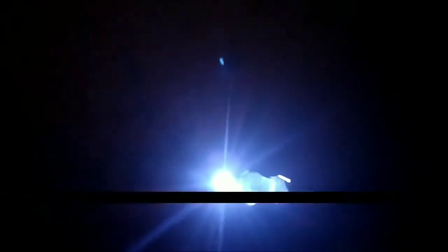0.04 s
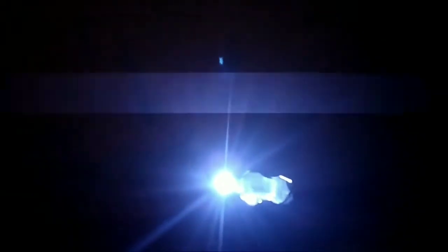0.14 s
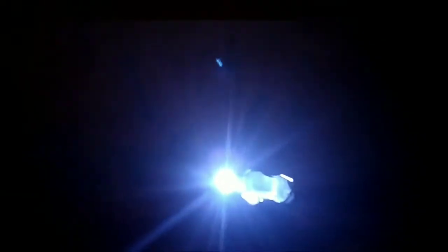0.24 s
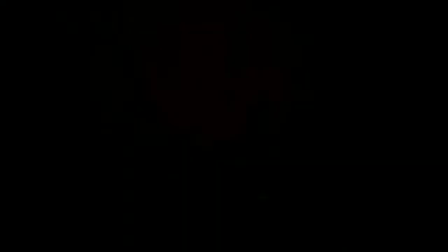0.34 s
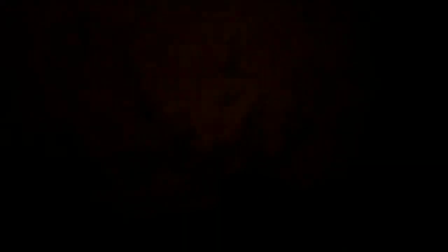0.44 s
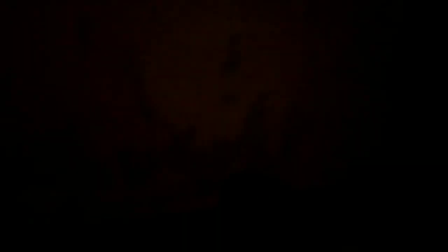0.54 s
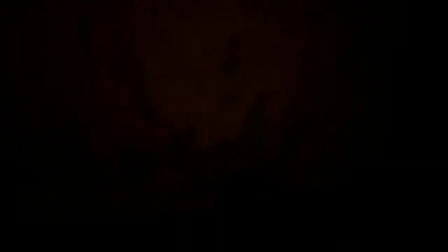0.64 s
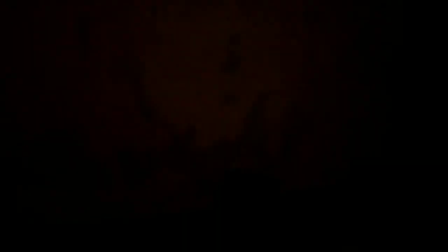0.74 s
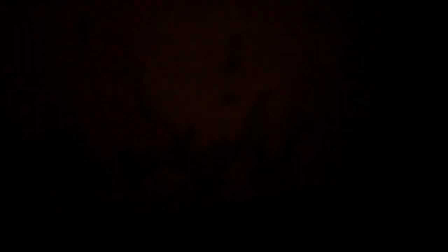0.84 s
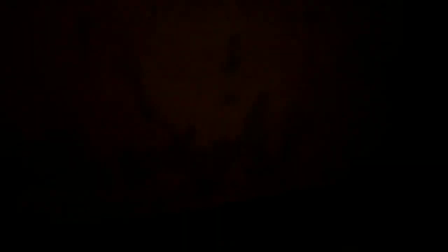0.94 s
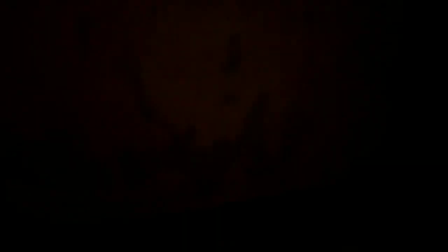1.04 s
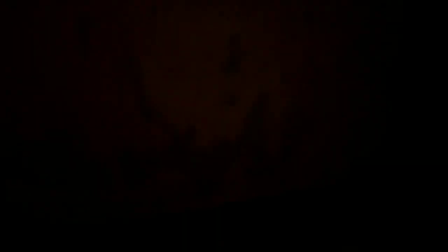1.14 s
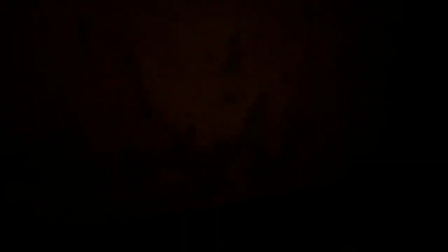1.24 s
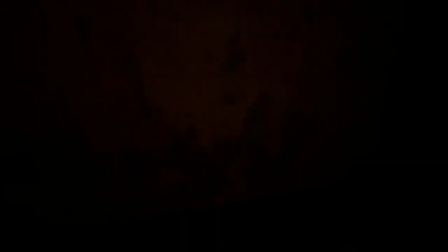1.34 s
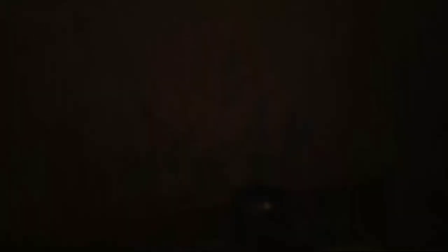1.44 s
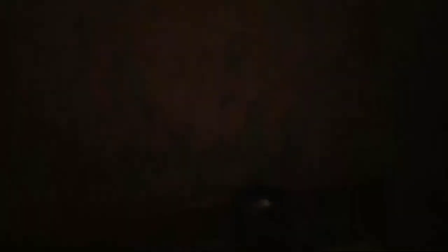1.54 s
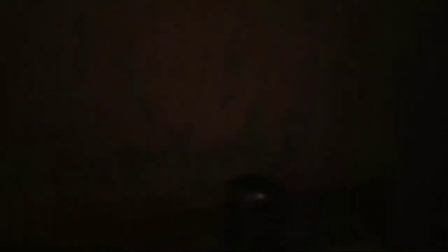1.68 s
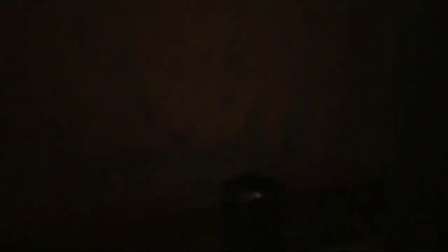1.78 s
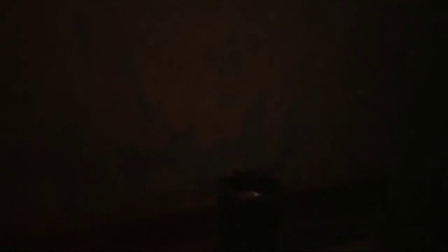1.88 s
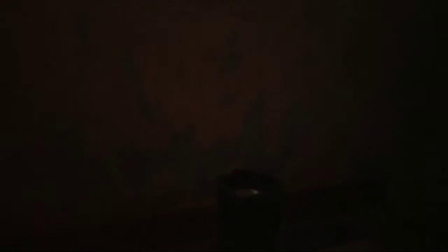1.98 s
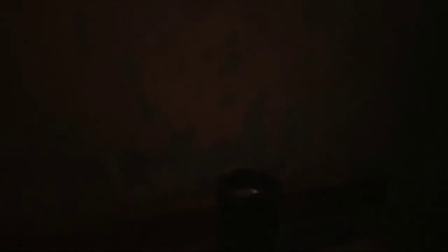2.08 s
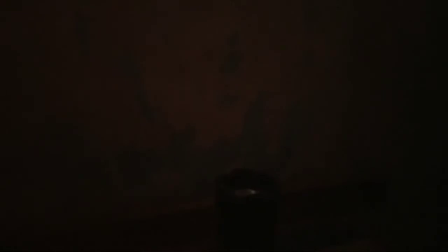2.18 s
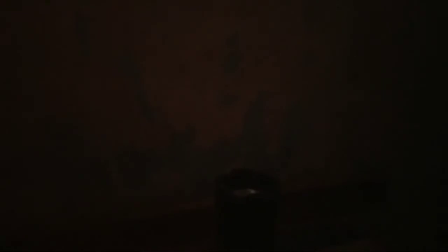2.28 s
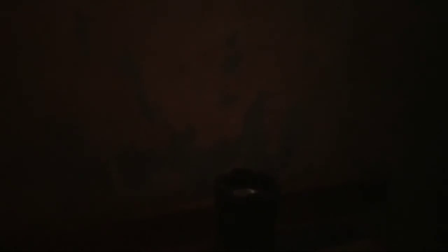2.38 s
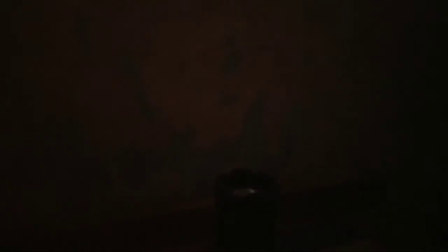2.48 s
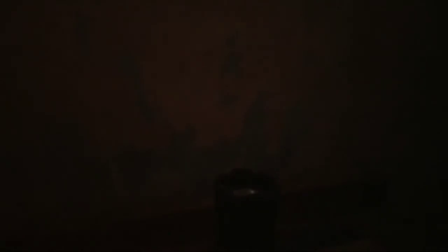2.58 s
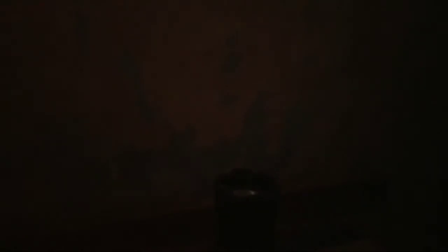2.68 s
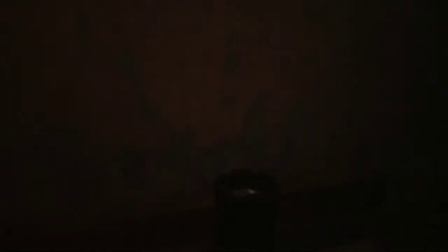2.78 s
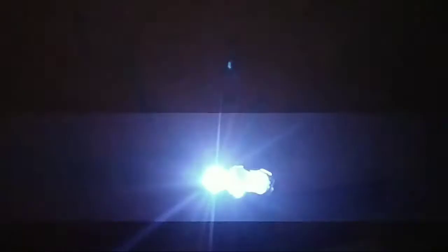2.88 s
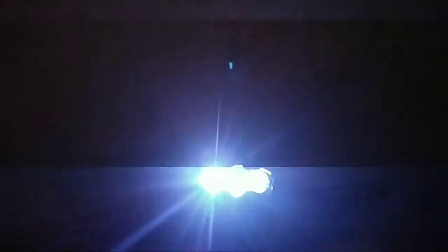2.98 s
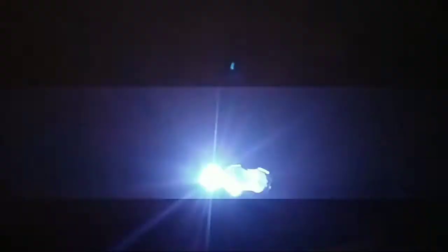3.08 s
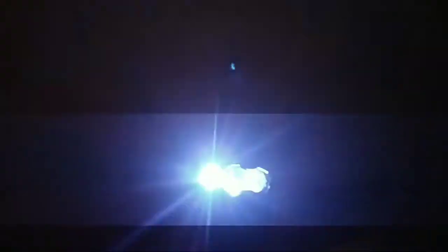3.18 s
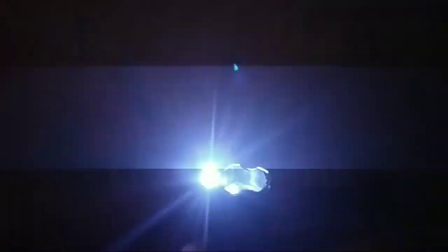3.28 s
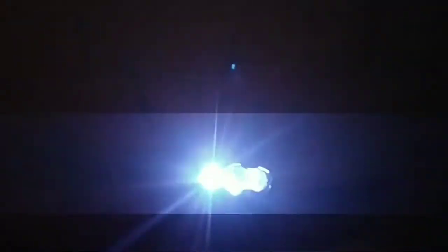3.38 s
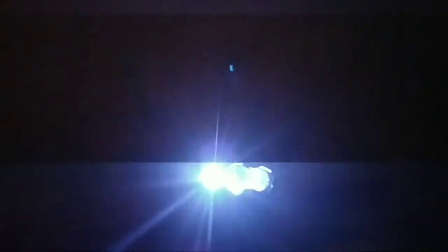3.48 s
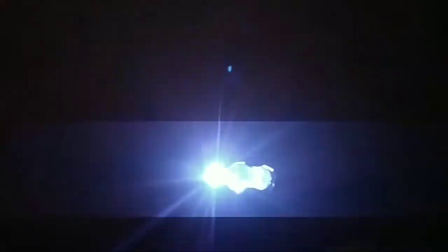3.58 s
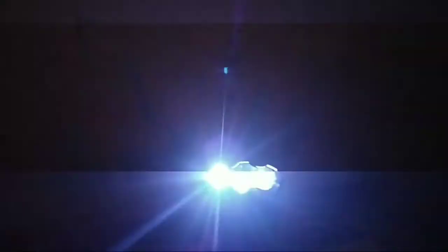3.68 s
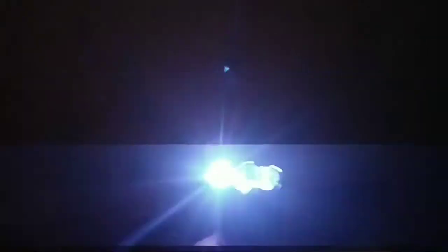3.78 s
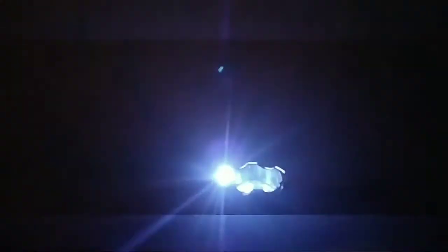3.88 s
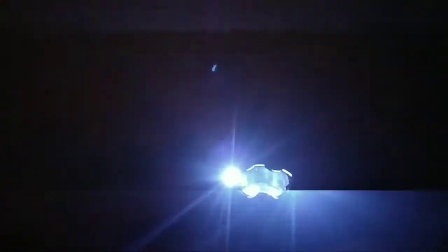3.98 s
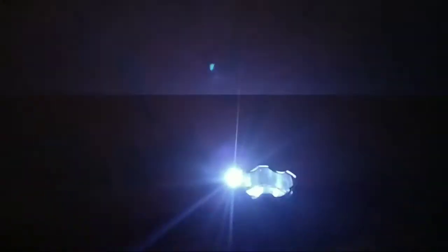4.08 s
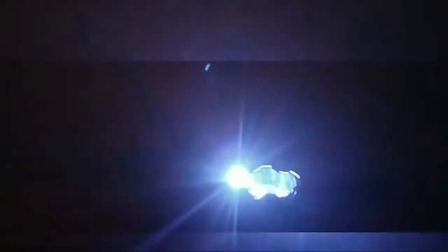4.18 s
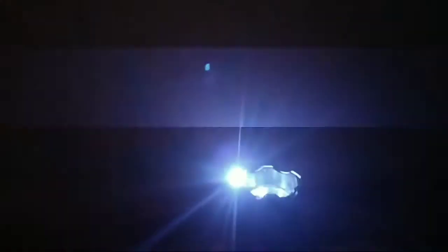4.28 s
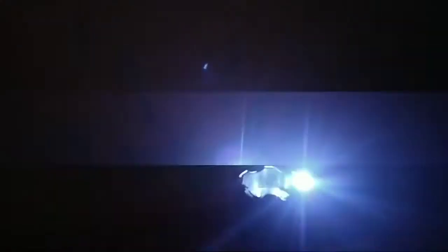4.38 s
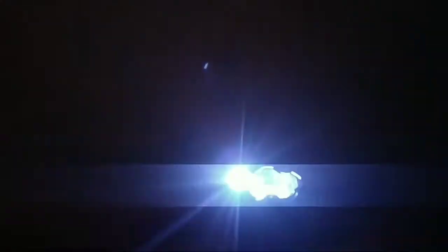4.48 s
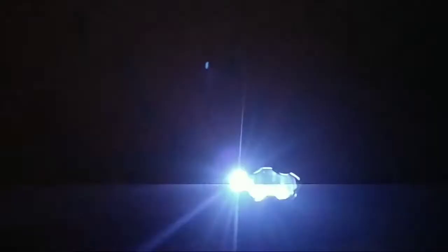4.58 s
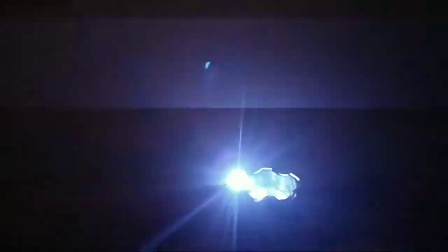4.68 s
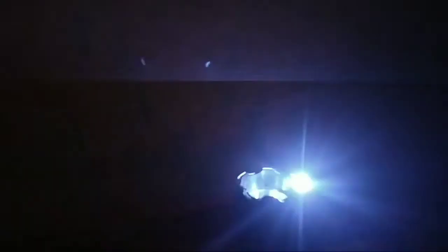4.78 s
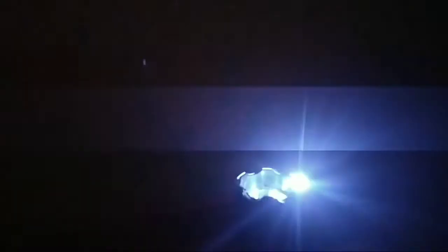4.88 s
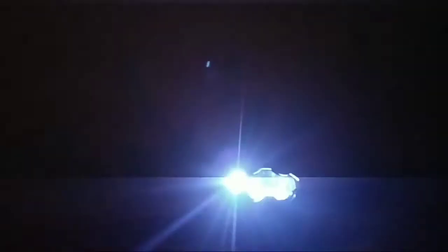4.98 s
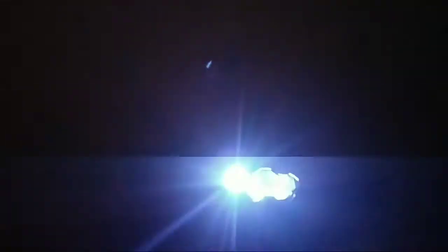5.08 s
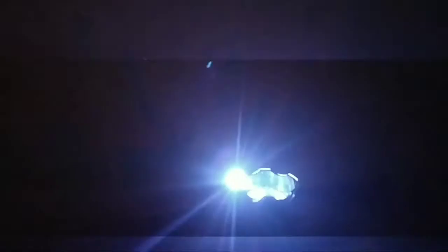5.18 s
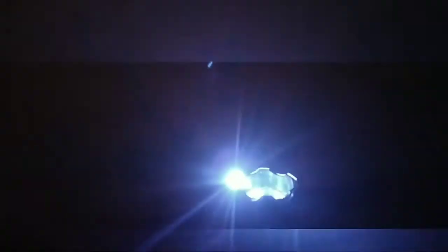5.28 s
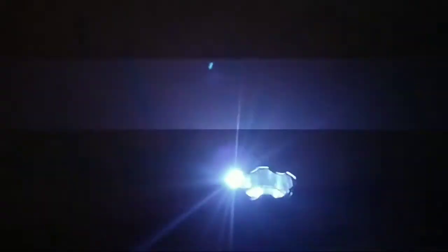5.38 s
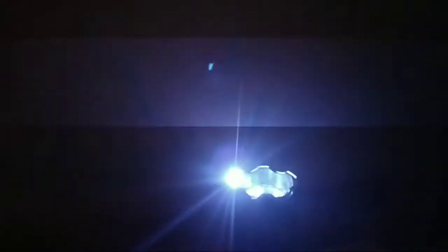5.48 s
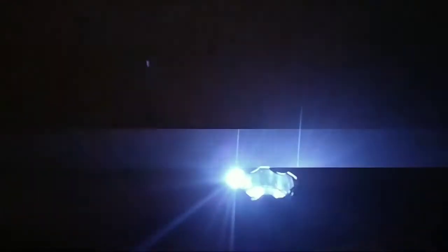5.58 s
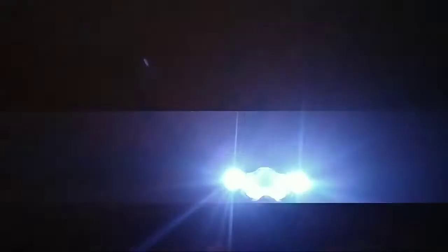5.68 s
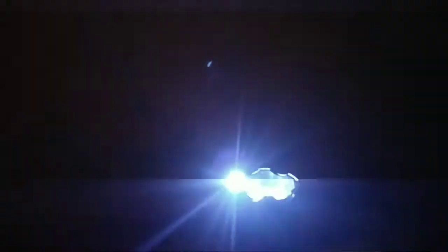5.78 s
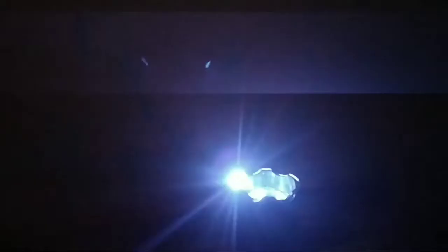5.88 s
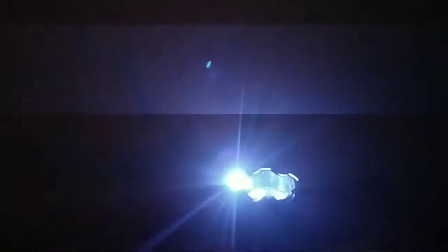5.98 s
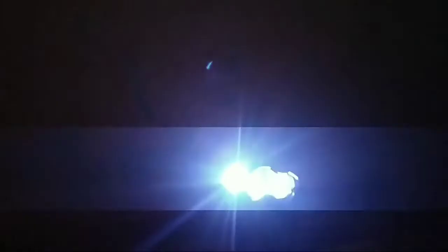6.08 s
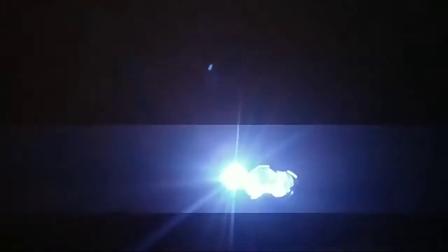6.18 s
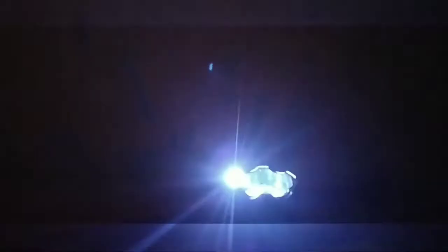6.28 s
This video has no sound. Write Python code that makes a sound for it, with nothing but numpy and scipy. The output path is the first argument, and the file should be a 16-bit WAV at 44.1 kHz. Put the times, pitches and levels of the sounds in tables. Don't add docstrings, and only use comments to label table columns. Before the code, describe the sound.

A handheld stun gun crackles very close to an overloaded stereo microphone in a small hard-walled room. A short burst of bright, rapid sparks is already under way, stops and rings away, leaving low rumble and hum. A small switch click and grip knock follow, then a much longer, harsher burst continues to the end.

```python
import sys
import numpy as np
from scipy import signal
from scipy.fft import rfft, irfft, next_fast_len
from scipy.io import wavfile
from scipy.ndimage import uniform_filter1d

SR = 44100
rng = np.random.default_rng(int(sys.argv[2]) if len(sys.argv) > 2 else 0)


def amp(db):
    return 10 ** (np.asarray(db, float) / 20)


def write(x):
    x = np.atleast_2d(x).T
    wavfile.write(sys.argv[1], SR, np.round(np.clip(x, -1, 1) * 32767).astype(np.int16))


N = 279593
RUN_IN = 13230
SIZE = next_fast_len(N + 2 * RUN_IN)
PAUSE = 2 * SR


def fill(hard):
    # start_s, crack_db, throw_left_percent, throw_right_percent
    hand_aim = [(0, -27, 0.55, -1), (.45, -24, .4, -1.5), (2.96, -25.5, 0.74, -5.5), (3.3, -27, 2.5, -3.5),
                (3.68, -28, 3.5, -3), (3.95, -25.5, 6.1, -6), (4.0, -27, 5.6, 1.5), (4.65, -26.5, 2.7, 5),
                (5.2, -27, 3.7, 3), (6.0, -25.5, 1.7, 3), (6.3, -26.5, 3, 4.5)]
    charge_s, jitter_s = .0303, .0006
    crack_spread_db, throw_spread_percent = 1.57, 2.83
    rebound = 0.84
    aim_s, *aim = np.transpose(hand_aim)
    rows = [hard[0]]
    for (start_s, _, throw_left, _), following in zip(hard, hard[1:]):
        gap_s = following[0] - start_s
        steps = round(gap_s / charge_s)
        at = start_s + gap_s * np.arange(1, steps) / steps
        spreads = [jitter_s, crack_spread_db, throw_spread_percent, throw_spread_percent]
        luck = rng.standard_normal((len(at), 4)) * spreads
        luck[:1, 2] -= rebound * min(throw_left, 0)
        usual = np.transpose([at, *(np.interp(at, aim_s, column) for column in aim)])
        rows += [*(usual + luck), following]
    return np.array(rows)


def fire():
    # start_s, crack_db, throw_left_percent, throw_right_percent
    first_burst = [(.0001, -28.5, 0, 3), (.0952, -26.5, -2, -1.5), (.1584, -23, -4.5, -3),
                   (.189, -25, 0, -3), (.2842, -19.5, -3, 3), (.3172, -24, 0, -7), (.3492, -24, -3.5, -1),
                   (.3817, -23, -2, -2), (.4133, -25.5, 3.5, -4), (.4455, -25.5, -2, -3)]
    second_burst = [(2.9637, -21, 1, 22), (3.0215, -23.5, -3.5, -6), (3.0786, -25, 15, 2.5),
                    (3.1378, -20.5, -7, -2), (3.1939, -24.5, -7.5, -2.5), (3.3664, -23, 15, 1),
                    (3.3947, -23, -11, -3.5), (3.454, -23.5, -7, -1), (3.541, -23.5, -4, -6),
                    (3.8643, -20.5, -14, 4), (4.0128, -24, 9, 6.5), (4.0432, -25, -5.5, 2),
                    (4.0728, -24.5, 4, 11.5), (4.161, -22.5, -5, -6), (4.3701, -23.5, -4.5, -8.5),
                    (4.5533, -20, -9, -11), (4.7033, -22.5, -0.5, -7), (4.823, -22.5, 7, 9.5),
                    (4.8836, -22, -7.5, -8.5), (4.943, -21, -6.5, -8.5), (5.0055, -24, -6.5, -5.5),
                    (5.2795, -23, -5, -6), (5.4629, -23.5, -10, -6.5), (5.5837, -24, 3, 7.5),
                    (5.7038, -22, -9.5, -3.5), (5.8272, -21, -11, -8), (5.9786, -22, -4.5, -9),
                    (6.041, -25, -5.5, -4), (6.135, -24.5, 8, 6.5), (6.32, -26, -6.5, -2.8)]
    return np.r_[fill(first_burst), fill(second_burst)]


FIRED = fire()


def train(levels):
    clicks = np.full((2, N + RUN_IN), 1e-18)
    clicks[:, RUN_IN + np.round(FIRED[:, 0] * SR).astype(int)] = levels
    clicks[:, RUN_IN % 1400:RUN_IN - 700:1400] = np.mean(levels)
    return clicks


def spread(clicks, shape):
    return signal.oaconvolve(clicks, shape, axes=1)[:, :clicks.shape[1]]


def bursts(decay_ms, steep):
    # delay_ms, left_db, right_db
    arrivals = [(0, -5, -4.5), (3.41, -7, -3), (5.75, -1, -2.5), (7.65, -7, -5.5), (12.46, -7, -11.5),
                (16.24, -2, -12), (18.42, -5.5, -13.5), (22.68, -12, -14.5)]
    ms = np.arange(1500) * 1000 / SR
    envelope = 0
    for delay_ms, left_db, right_db in arrivals:
        height = amp(steep * np.array([[left_db], [right_db]]))
        dying = np.exp(-np.maximum(ms - delay_ms, 0) / decay_ms)
        envelope = envelope + height * (ms >= delay_ms) * dying
    return envelope


def at_hz(points, hz):
    point_hz, value = np.transpose(points)
    return np.interp(np.log(hz), np.log(point_hz), value)


def coloured(x, spectrum, tilt):
    hz = np.arange(SIZE // 2 + 1) * SR / SIZE + 1
    gain = amp(at_hz(spectrum, hz) + np.outer([.5, -.5], at_hz(tilt, hz)))
    return irfft(rfft(x, SIZE) * gain, SIZE)[:, :x.shape[1]]


def band(x, low_hz, high_hz):
    sos = signal.butter(2, [low_hz, min(high_hz, .45 * SR)], "band", fs=SR, output="sos")
    return signal.sosfilt(sos, x)


def arc():
    # pitch_hz, level_db (per Hz)
    arc_colour = [(500, -35.5), (1000, -25), (1800, -14), (3000, -9.5), (4100, -12.5), (4700, -18.5),
                  (5600, -20), (6800, -17), (7600, -10), (8500, 0.5), (9800, -4.5), (14300, -4),
                  (14700, -28.5), (15200, -48)]
    # pitch_hz, difference_db
    arc_tilt = [(2000, 0), (6000, 0), (8300, -7.5), (9800, -2.5), (11500, 3.5), (14500, 3.5)]
    # pitch_hz, t60_s
    room_t60 = [(1200, .5), (2400, 0.46), (4500, 0.45), (7000, 0.44), (9000, 0.37), (12500, 0.38)]
    # pitch_hz, change_db
    first_tint = [(900, 0), (1200, -1.5), (2500, -1.5), (5000, 1.5), (8300, -1), (9300, 0.5), (10800, -1)]
    echo_lift_db, repeat_share = 6.5, .4
    shocks = train(amp(3 * rng.standard_normal(len(FIRED))))
    centres = np.array(room_t60)[:, 0]
    band_edges = np.r_[500, np.sqrt(centres[1:] * centres[:-1]), 16000]
    s = np.arange(2 * RUN_IN) / SR
    early = np.pad(bursts(decay_ms=.7, steep=.5), ((0, 0), (0, len(s) - 1500)))
    ringing = 0
    for (_, t60_s), low, high in zip(room_t60, band_edges, band_edges[1:]):
        dying = amp(-60 * s / t60_s) * (1 + amp(echo_lift_db) * early)
        same = spread(shocks, dying * rng.standard_normal(dying.shape))
        fresh_envelope = np.sqrt(np.abs(spread(shocks ** 2, dying ** 2)))
        fresh = fresh_envelope * rng.standard_normal(shocks.shape)
        mixed = np.sqrt(repeat_share) * same + np.sqrt(1 - repeat_share) * fresh
        ringing = ringing + band(mixed, low, high) / np.sqrt(t60_s)
    ringing = coloured(ringing, arc_colour, arc_tilt)[:, RUN_IN:]
    first = coloured(ringing[:, :PAUSE], first_tint, [(100, 0), (200, 0)])
    ringing = np.c_[first, ringing[:, PAUSE:]]
    return ringing / np.sqrt(np.mean(ringing ** 2))


def cracks():
    crack_db = FIRED[:, 1]
    fizz = amp(np.array([[-18], [-28]]))
    clicks = train(amp(crack_db + np.array([[-3], [2]])))
    gate = spread(clicks, bursts(decay_ms=0.62, steep=0.83) + fizz)
    direct = spread(train(np.ones(len(FIRED))), np.ones((1, 110)))[:, :PAUSE] > .01
    gate[:, :PAUSE] *= np.where(direct, amp(3.0), amp(-3))
    shared = 0.43 * rng.standard_normal(N + RUN_IN)
    noise = shared + 0.99 * rng.standard_normal(gate.shape)
    return amp(18.0) * band(gate * noise, 200, 2100)


def direct_shocks():
    shock_db, shock_ms = np.array([[-16], [-11]]), .11
    suck_db, suck_ms = np.array([[-24], [-9]]), .8
    after_ms = np.arange(90) * 1000 / SR - .3
    onset = np.where(after_ms > 0, 1 - np.exp(-after_ms / 0.098), 0)
    suck = onset * np.exp(-after_ms / suck_ms)
    shock = np.exp(-(after_ms / shock_ms) ** 2) - amp(suck_db) * suck
    levels = amp(shock_db + 2.0 * rng.standard_normal((2, len(FIRED))))
    return spread(train(levels), shock)


def thumps():
    throws = FIRED[:, 2:].T / 100
    ms = np.maximum(np.arange(900) * 1000 / SR - .4, 0)
    push = (1 - np.exp(-ms / 0.26)) * np.exp(-ms / 1.07)
    bass_cut = signal.butter(3, 68, "high", fs=SR, output="sos")
    return signal.sosfiltfilt(bass_cut, spread(train(amp(16) * throws), push[None]))


def overload():
    return (cracks() + direct_shocks() + thumps())[:, RUN_IN:]


def lurch():
    start_s, width_ms, level_db = 2.962, 3, np.array([[-38.5], [-14]])
    ms = (np.arange(N) / SR - start_s) * 1000
    swing = amp(level_db) * np.exp(-(ms / width_ms) ** 2) * (1 - ms / width_ms)
    return signal.sosfiltfilt(signal.butter(2, 35, "high", fs=SR, output="sos"), swing)


def rms_one(x):
    return x / np.sqrt(np.mean(x ** 2, axis=-1, keepdims=True) + 1e-20)


def handling():
    # start_s, peak_db, centre_hz, t60_s
    knocks = [(1.2142, -52, 12000, .015), (1.2283, -33.5, 1530, .014), (1.2275, -40, 450, 0.1),
              (1.2275, -41, 190, 0.17), (1.25, -44, 340, .2), (1.2284, -47.5, 10500, 0.019),
              (1.270, -47, 2200, 0.02), (5.1, -52, 11000, .012), (3.3, -56, 3000, .012)]
    out = np.zeros((2, N))
    s = np.arange(6000) / SR
    for start_s, peak_db, centre_hz, t60_s in knocks:
        noise = rng.standard_normal(len(s)) + 0.45 * rng.standard_normal((2, len(s)))
        puff = rms_one(band(noise, centre_hz / 1.3, centre_hz * 1.4))
        first = round(start_s * SR)
        out[:, first:first + len(s)] += amp(peak_db - 1.5 - 60 * s / t60_s) * puff
    return out


def room_tone():
    # start_s, level_db
    room_level = [(0, -48.5), (1.53, -49), (1.58, -52.5), (1.63, -51.5), (1.7, -48), (1.76, -49),
                  (6.4, -48.5)]
    # pitch_hz, level_db (per Hz)
    rumble = [(45, -24.5), (95, -13), (145, 2), (200, -4), (400, 2), (630, -5.5), (950, -4), (1200, -10.5),
              (3200, -21.5), (4300, -32.5), (5800, -38.5), (7600, -35.5), (10500, -27.5), (14300, -33.5),
              (15000, -51.5)]
    # pitch_hz, difference_db
    rumble_tilt = [(60, 5.0), (110, 9), (200, 4), (370, 4), (690, 0), (1270, 0.5), (2330, 0.5),
                   (4290, -0.5), (7900, -0.5), (14600, 4.5)]
    # pitch_hz, likeness (0 to 1)
    rumble_alike = [(60, 0.77), (130, 1), (290, 0.27), (630, 0.64), (1380, 0.017), (3030, 0.0061),
                    (6640, 0), (14600, 0.18)]
    hum_hz, hum_db = 84.5, np.array([[-5.5], [-10.5]])
    hz = np.arange(SIZE // 2 + 1) * SR / SIZE + 1
    alike = at_hz(rumble_alike, hz)
    mid, side = rfft(rng.standard_normal((2, SIZE)))
    pair = np.sqrt(1 + alike) * mid + np.sqrt(1 - alike) * side * [[1], [-1]]
    noise = coloured(irfft(pair, SIZE)[:, :N], rumble, rumble_tilt)
    s = np.arange(N) / SR
    hum = amp(hum_db) * np.sin(2 * np.pi * hum_hz * s)
    level = amp(np.interp(s, *np.transpose(room_level)))
    return level * (noise / np.sqrt(np.mean(noise ** 2)) + hum)


def scene():
    return arc() + handling() + room_tone()


def band_limit(x):
    return signal.sosfilt(signal.butter(12, 15150, fs=SR, output="sos"), x)


def record(dry):
    ceiling_db, ratio, limit_ms = np.array([[-20.5], [-18.5]]), 6.35, 4.2
    power = uniform_filter1d(dry ** 2, size=round(limit_ms * SR / 1000), axis=1)
    level_db = 10 * np.log10(power + 1e-12)
    over_db = np.maximum(level_db - ceiling_db, 0)
    held = dry * amp(-over_db * (1 - 1 / ratio))
    driven = np.tanh(held + overload() + lurch())
    top_cut = signal.cheby2(12, 70, 15300, fs=SR, output="sos")
    return band_limit(signal.sosfilt(top_cut, driven))


dry = scene()
out = record(dry)
write(out)
```